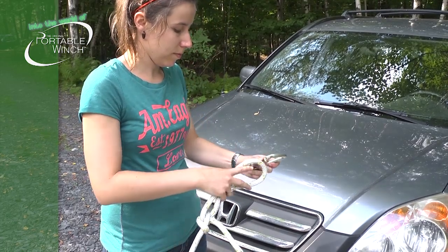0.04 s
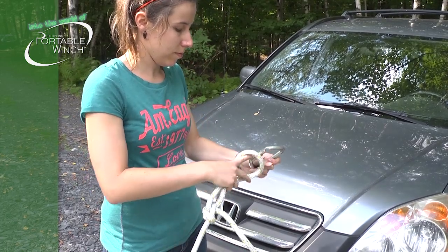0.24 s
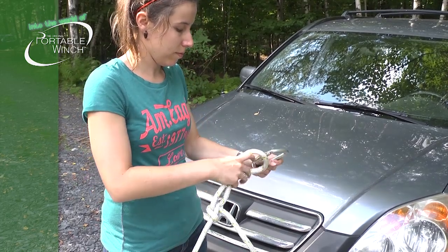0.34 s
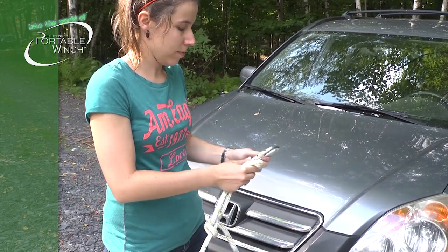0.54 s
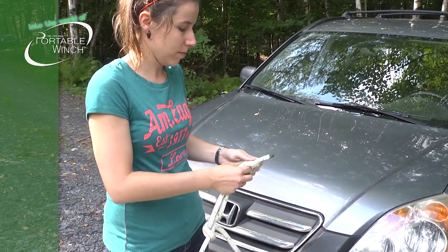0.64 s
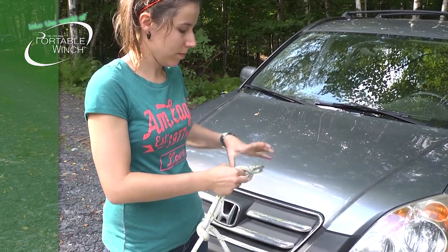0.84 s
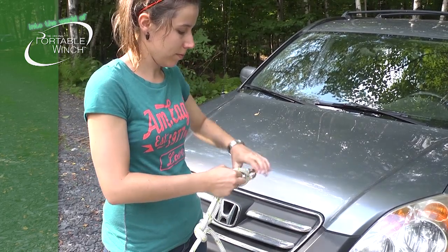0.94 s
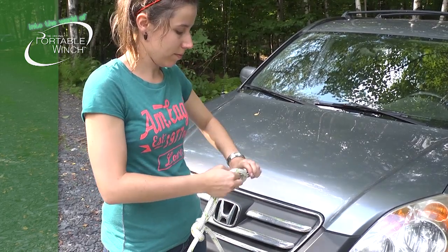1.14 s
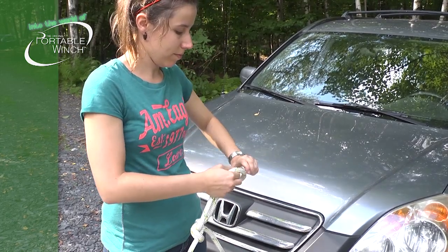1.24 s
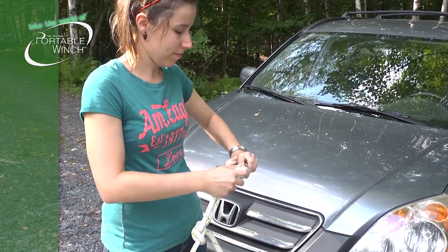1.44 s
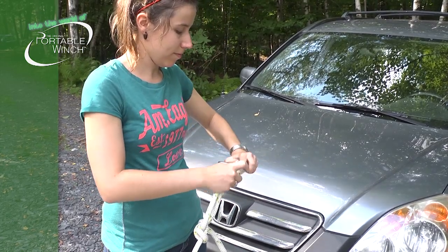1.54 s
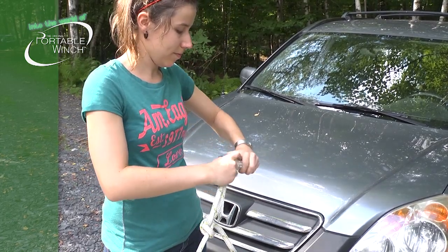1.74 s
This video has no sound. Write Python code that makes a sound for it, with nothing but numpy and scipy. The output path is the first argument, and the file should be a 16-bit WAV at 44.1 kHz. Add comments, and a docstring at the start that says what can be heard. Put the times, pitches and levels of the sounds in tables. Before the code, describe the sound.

One hard metallic carabiner click near the microphone, with a short woodland echo and low wind rumble

```python
"""First a far motor hums behind low wind rumble and faint hiss, as a brief soft tone dies away.
Then a carabiner held in the hand snaps shut close to the microphone, outdoors at the edge of a wood.
The gate ticks, then hits the frame hard enough to overload the microphone. Damped ringing tones and a
noise crack make the snap, fading noise makes its echoes from the trees, and wavering sines make the hum.
Wind, hiss and the motor's whir are coloured noise; a dull handling bump is a short low tone."""
import sys
import numpy as np
from scipy import signal
from scipy.fft import rfft, irfft
from scipy.io import wavfile

SR = 44100
rng = np.random.default_rng(int(sys.argv[2]) if len(sys.argv) > 2 else 0)


def wav_record(signal):
    """Record a signal, one row per channel, as 16-bit PCM in the file named by sys.argv[1]."""
    frames = np.transpose(np.atleast_2d(signal))
    bounded = np.clip(frames, -1, 1)
    # unit amplitude maps onto the largest positive 16-bit level
    quanta = np.round(bounded * 32767).astype(np.int16)
    wavfile.write(sys.argv[1], SR, quanta)


N = 79380   # length in samples: 1.8 s
T = np.arange(N) / SR


def from_db(db):
    """Turn decibels into a plain multiplier."""
    return 10 ** (np.asarray(db) / 20)


def rms_one(x):
    """Scale a sound so that its average strength (rms) is 1."""
    return x / np.sqrt(np.mean(x ** 2) + 1e-20)


def level(rows):
    """Join loudness points (t/s, level/dB) into a multiplier over time."""
    times, decibels = np.transpose(rows)
    return from_db(np.interp(T, times, decibels))


def at_hz(rows, hz, axis=1):
    """Read a table column between its rows, with pitch spaced by ratio as the ear does."""
    rows = np.array(rows)
    return np.interp(np.log(hz + 1e-9), np.log(rows[:, 0]), rows[:, axis])


def noise(colour):
    """Shape even noise to a colour (f/Hz, level/dB), then scale it to rms 1."""
    hz = np.fft.rfftfreq(N, 1 / SR)
    spectrum = rfft(rng.standard_normal(N)) * from_db(at_hz(colour, hz))
    return rms_one(irfft(spectrum, N))


def drift(rate_hz):
    """Wander slowly at random by keeping mostly the slow part of noise; rms 1."""
    hz = np.fft.rfftfreq(N, 1 / SR)
    spectrum = rfft(rng.standard_normal(N)) / (1 + (hz / rate_hz) ** 2)
    return rms_one(irfft(spectrum, N))


def swell(s, hz, db, half):
    """Let a sine swell and fade along a bell curve around time s; the sign of half does not matter."""
    envelope = np.exp(-((T - s) / half) ** 2)
    return from_db(db) * envelope * np.sin(2 * np.pi * hz * T)


# colour of the steady hiss: f/Hz, relative level/dB per Hz
HISS_COLOUR = [(200, 12), (1000, 4.5), (2000, 5), (4200, 3), (5400, 7), (6400, -2), (10000, -7),
               (15500, -3.5)]
HISS_DB = -64   # rms


def hiss():
    """Faint hiss: coloured noise that stays equally loud."""
    return from_db(HISS_DB) * noise(HISS_COLOUR)


# colour of the wind on the microphone: f/Hz, relative level/dB per Hz
WIND_COLOUR = [(12, -7.5), (26, 4), (42, -5.5), (65, -10), (100, -16.5), (130, -21.5), (200, -35.5),
               (400, -56)]
# how loud the wind is over time: t/s, level/dB
WIND_LEVEL = [(0, -42.5), (.06, -35.5), (.11, -41.5), (.165, -36), (.23, -38), (.39, -41), (.56, -37),
              (.8, -37), (.95, -41), (1.07, -39.5), (1.4, -39.5), (1.55, -38), (1.8, -38.5)]


def wind():
    """Wind pushing on the microphone: deep noise that rises and falls."""
    return level(WIND_LEVEL) * noise(WIND_COLOUR)


# low tones of the far motor: f/Hz, rms level/dB before the changes below
HUM_TONES = [(269.6, -66), (310, -67), (329.5, -56.5), (390, -73.5), (449, -72.5)]
HUM_WAVER_DB, HUM_WAVER_HZ = 2.5, 1.5   # typical wander in loudness and pitch
# the hum sinks around the snap, then comes back: t/s, level change/dB
HUM_LEVEL = [(0, -9.5), (.19, -18), (.26, -23), (.52, -15.5), (.62, -9), (.74, 0), (.81, -4), (.89, -0.5),
             (1.02, 2), (1.1, -2.5), (1.16, 4.5), (1.23, -6.5), (1.31, 4.5), (1.48, -4.5), (1.54, 2.5),
             (1.8, 1.5)]


def motor_hum():
    """The far motor's low tones: sines that waver in loudness and pitch."""
    tones = np.zeros(N)
    for hz, db in HUM_TONES:
        loudness = np.sqrt(2) * from_db(db + HUM_WAVER_DB * drift(6))   # root 2: rms to peak
        pitch = hz + HUM_WAVER_HZ * drift(5)
        phase = 2 * np.pi * np.cumsum(pitch) / SR
        tones += loudness * np.sin(phase)
    return level(HUM_LEVEL) * tones


# colour of the motor's airy whir: f/Hz, relative level/dB per Hz
WHIR_COLOUR = [(150, -0.5), (300, 0.5), (420, -2), (620, -6), (760, -1.5), (850, 4.5), (940, 3.5),
               (1060, -9), (1400, -13), (2500, -26)]
# how loud the whir is over time: t/s, level/dB
WHIR_LEVEL = [(0, -57.5), (.08, -55.5), (.16, -57), (.26, -62), (.4, -61), (.51, -59.5), (.58, -55.5),
              (.9, -56), (1.25, -54.5), (1.45, -56), (1.8, -54)]


def motor_whir():
    """The far motor's airy whir: a band of noise with a changing level."""
    return level(WHIR_LEVEL) * noise(WHIR_COLOUR)


# a soft tone centred just before the start, so only its end is heard: t/s, f/Hz, level/dB, half length/s
SOFT_TONE = (-0.03, 899.5, -49, -0.0764)


def soft_tone():
    """A brief soft tone: one sine dying away along a bell curve."""
    return swell(*SOFT_TONE)


# a dull bump during the snap: t/s, f/Hz, level/dB, half length/s
BUMP = (0.22, 62, -28.5, 0.0355)


def handling_bump():
    """A dull bump from handling: a deep sine that swells and fades quickly."""
    return swell(*BUMP)


WOOD_DB, WOOD_DELAY_S, WOOD_BUILD_S = -28.5, .006, .008   # echo level, wait and build-up time
# echoes from the trees by pitch: f/Hz, relative level/dB, time to fade by 60 dB/s
WOOD = [(500, -5, .3), (2000, -4.5, .4), (3200, -6, .42), (4200, 2, 0.7), (5500, -1, .55),
        (8000, 0.5, 0.44), (13000, -2.5, .42)]


def wood(snap):
    """Trees scatter the snap into countless small echoes; each pitch band fades at its own pace."""
    edges = np.geomspace(400, 16000, 15)
    white = rng.standard_normal((2, N))
    echoes = np.zeros(N)
    age = np.maximum(T - WOOD_DELAY_S, 0)
    for k, (low, high) in enumerate(zip(edges, edges[1:])):
        hz = np.sqrt(low * high)
        band_filter = signal.butter(2, [low, high], "band", fs=SR, output="sos")
        band = signal.sosfilt(band_filter, white[k % 2])   # neighbours use different noise
        fade = np.exp(-np.log(1000) * age / at_hz(WOOD, hz, axis=2))
        echoes += band * from_db(at_hz(WOOD, hz)) * fade
    build_up = 1 - np.exp(-age / WOOD_BUILD_S)   # zero until the delay has passed
    echoes = rms_one(echoes * build_up) / np.sqrt(N)   # total energy 1
    return from_db(WOOD_DB) * signal.fftconvolve(snap, echoes)[:N]


def ring(clicks, hz, t60):
    """Each click sets a sine ringing, which fades by 60 dB in t60 seconds."""
    shrink = from_db(-60 / (t60 * SR))   # per sample
    turn = 2 * np.pi * hz / SR           # angle per sample
    feedback = [1, -2 * shrink * np.cos(turn), shrink * shrink]
    return signal.lfilter([0, np.sin(turn)], feedback, clicks + 1e-18)


# contacts of gate and frame, and last a quieter repeat of the hit just after: t/s, strength level/dB
CONTACTS = [(.2093, -32.5), (0.2093, -26.5), (0.214, 0.5), (0.2201, -15.5)]
# tones of the hand-damped frame: f/Hz, level/dB before the bass cut, time to fade by 60 dB/s
FRAME_TONES = [(1600, -27.5, .014), (2060, -18, 0.031), (2820, -28.5, 0.02518), (3045, -7.5, 0.03),
               (3390, -11, 0.028), (3630, -13, 0.032), (3990, -6, .026), (4207, -2.5, .028),
               (4322, -2, .028), (4519, -12, 0.022), (5020, -13, 0.026), (5402, -8, 0.032),
               (5674, -11, .024), (5854, -9.5, 0.02251), (6280, -16.5, .022), (6560, -15, 0.028),
               (6980, -17, 0.015), (7767, -5, .016), (9100, -13.5, 0.0202), (9397, -9, 0.022),
               (10370, -16, .022), (11250, -16.5, .012), (13300, -15, 0.01379)]
RADIATES_ABOVE_HZ = 2170   # so small a body gives out little bass
# colour of the crack: f/Hz, relative level/dB
CRACK_COLOUR = [(150, -9.5), (700, -2.5), (1050, -11.5), (1400, -1), (2600, 1.5), (4500, 1), (8000, 3.5),
                (12000, -5.5), (16000, -2.5)]
CRACK_DB, CRACK_T60_S = -7.5, 0.02


def carabiner():
    """Each contact, and the quieter repeat of the hit, gives a short noise crack and rings the metal frame,
    whose tones the hand damps."""
    clicks = np.zeros(N)
    for s, db in CONTACTS:
        clicks[int(s * SR)] += from_db(db)
    frame = np.zeros(N)
    for hz, db, t60 in FRAME_TONES:
        frame += from_db(db) * ring(clicks, hz, t60)
    bass_cut = signal.butter(2, RADIATES_ABOVE_HZ, "high", fs=SR, output="sos")
    frame = signal.sosfilt(bass_cut, frame)
    keep = np.exp(-np.log(1000) / (CRACK_T60_S * SR))   # share left after each sample
    burst = signal.lfilter([1], [1, -keep], clicks + 1e-18)
    crack = from_db(CRACK_DB) * burst * noise(CRACK_COLOUR)
    return frame + crack


SIDE_DB = -66   # rms of the wide hiss


def scene():
    """Add all sources in the centre, and a trace of hiss with opposite signs left and right."""
    background = hiss() + wind() + motor_hum() + motor_whir() + soft_tone()
    snap = carabiner()
    centre = background + handling_bump() + wood(snap) + snap
    wide_hiss = from_db(SIDE_DB) * rng.standard_normal(N)
    return centre + wide_hiss * np.array([[1], [-1]])


OVERLOAD_KNEE = 5     # higher bends more sharply into the limit
CUTOFF_HZ = 16200


def record(dry):
    """The microphone overloads smoothly towards full scale, then a steep filter cuts the top."""
    clipped = dry / (1 + np.abs(dry) ** OVERLOAD_KNEE) ** (1 / OVERLOAD_KNEE)
    top_cut = signal.cheby2(16, 70, CUTOFF_HZ, fs=SR, output="sos")
    return signal.sosfilt(top_cut, clipped)


dry = scene()
out = record(dry)
wav_record(out)
```